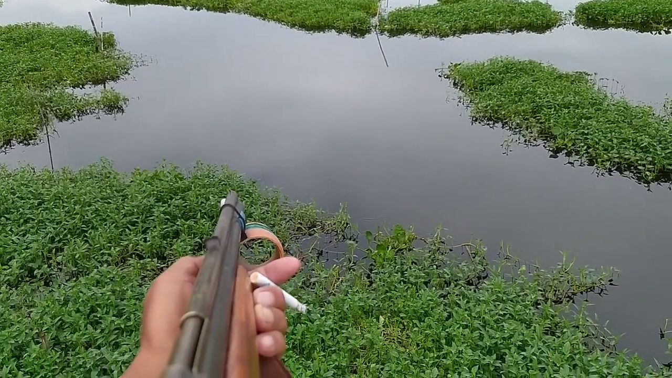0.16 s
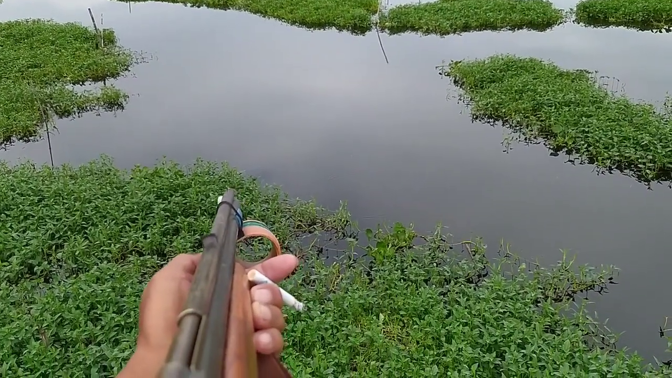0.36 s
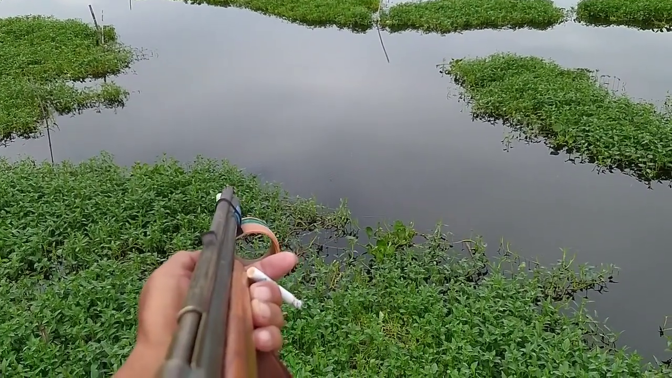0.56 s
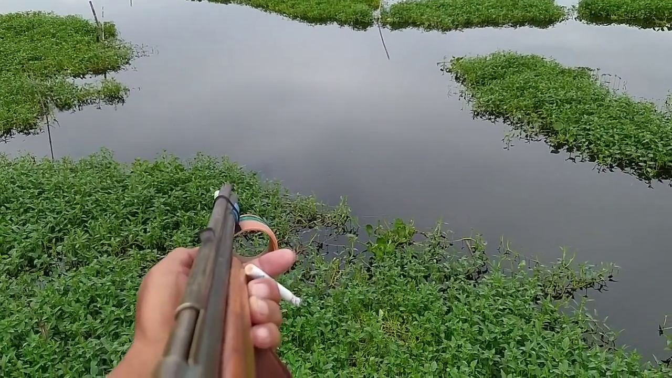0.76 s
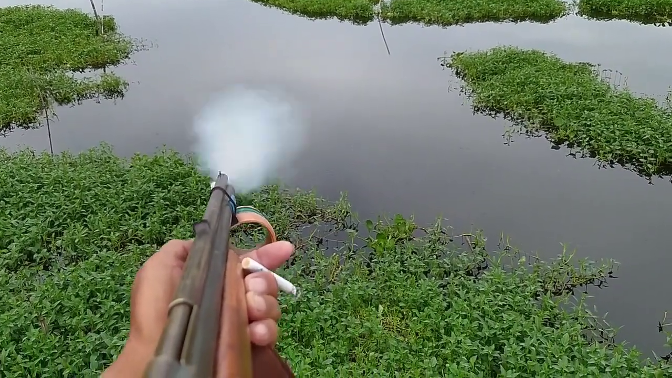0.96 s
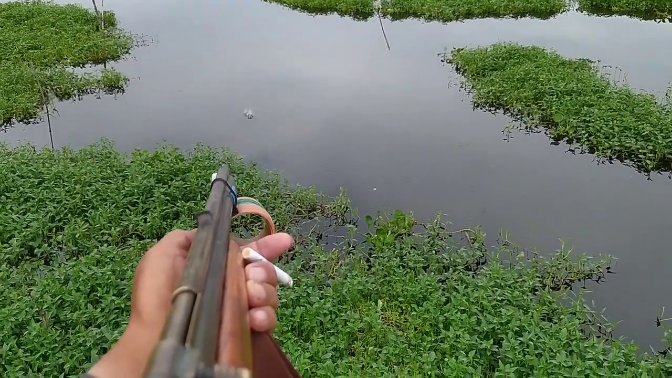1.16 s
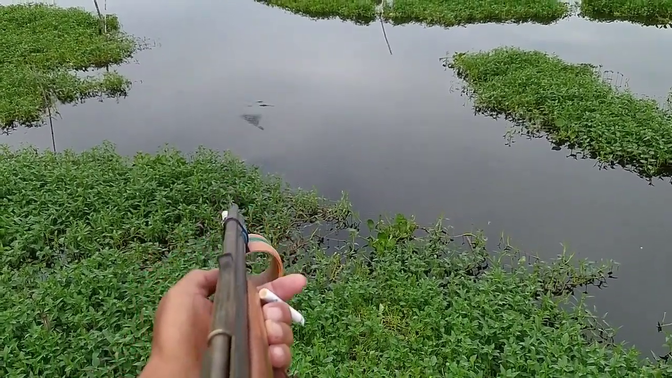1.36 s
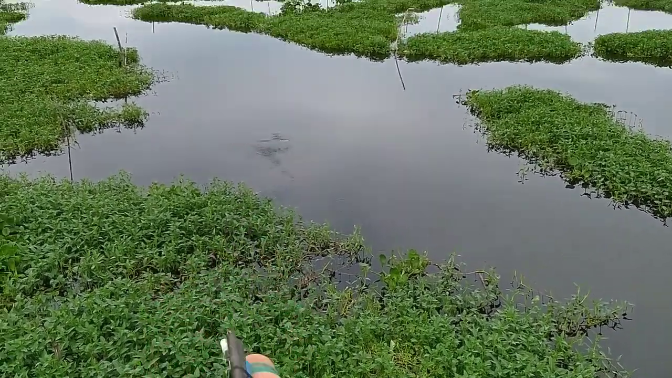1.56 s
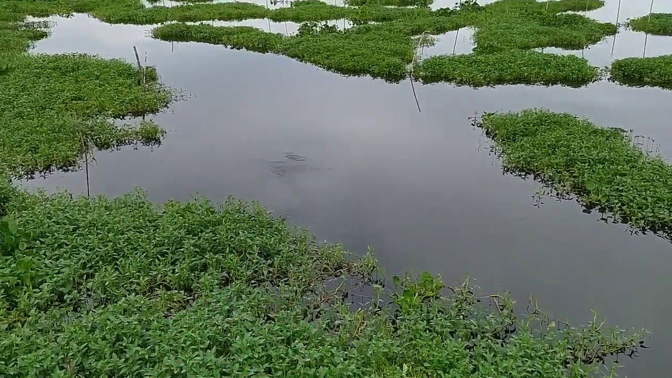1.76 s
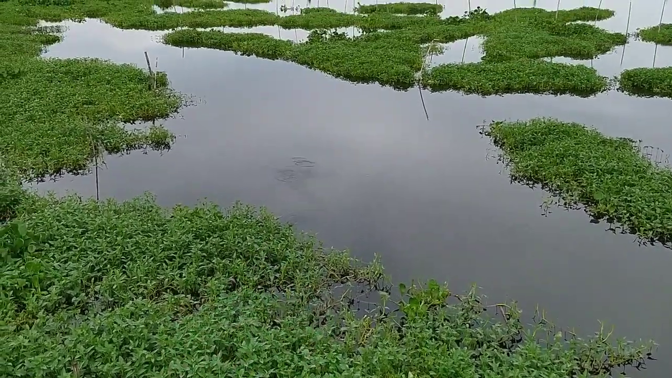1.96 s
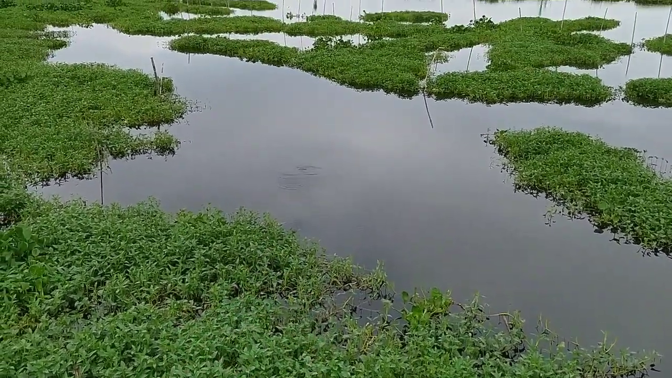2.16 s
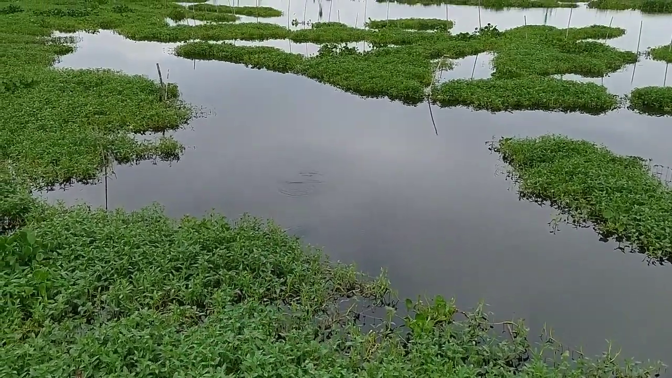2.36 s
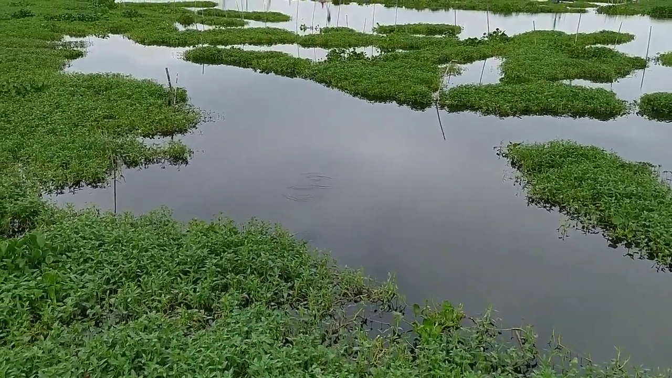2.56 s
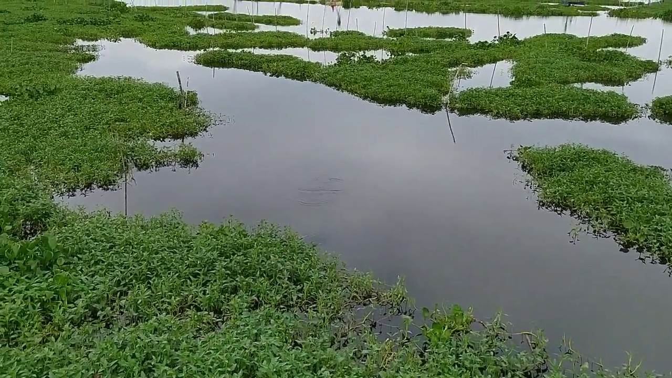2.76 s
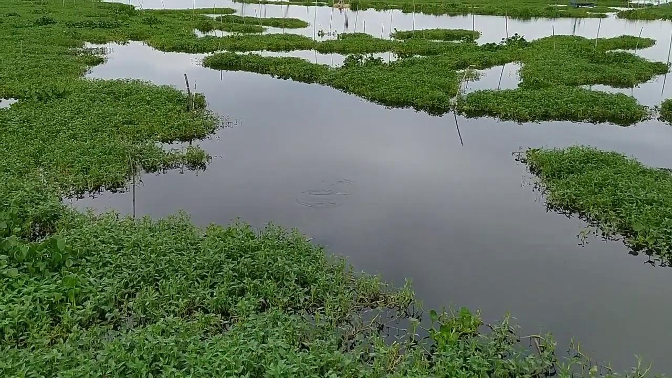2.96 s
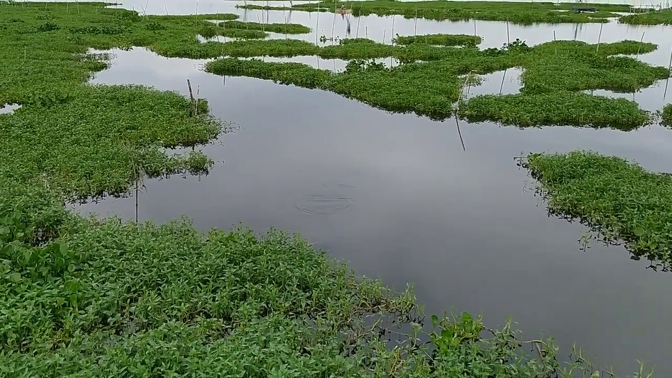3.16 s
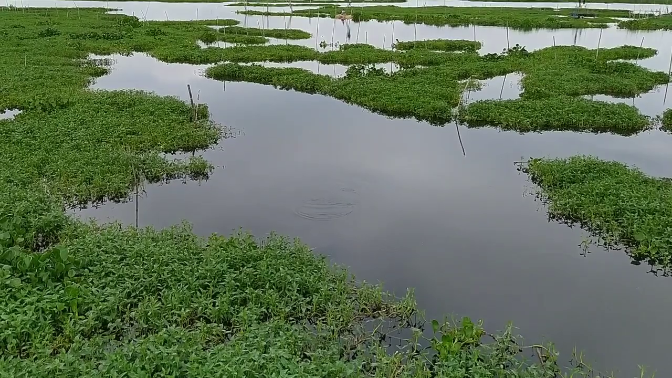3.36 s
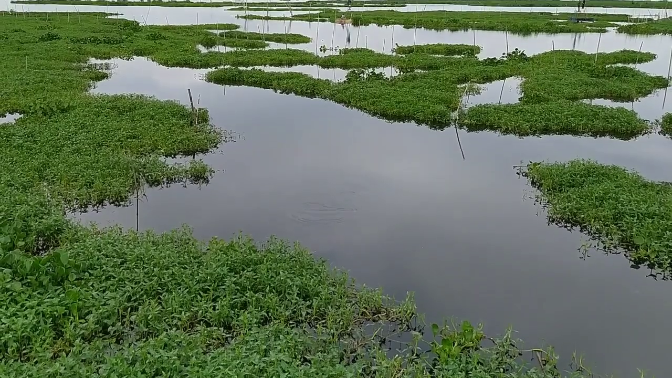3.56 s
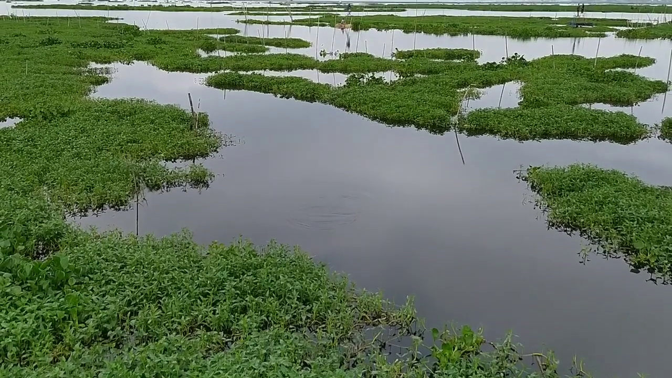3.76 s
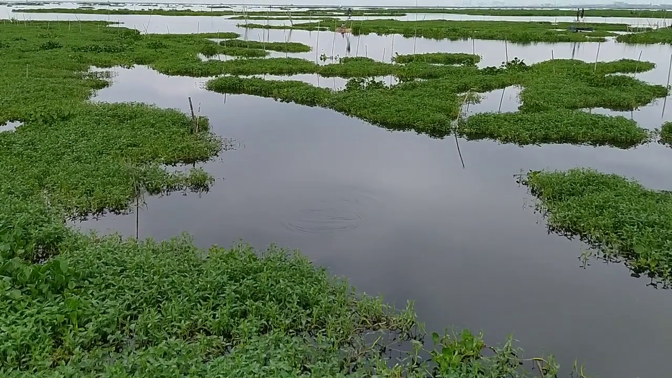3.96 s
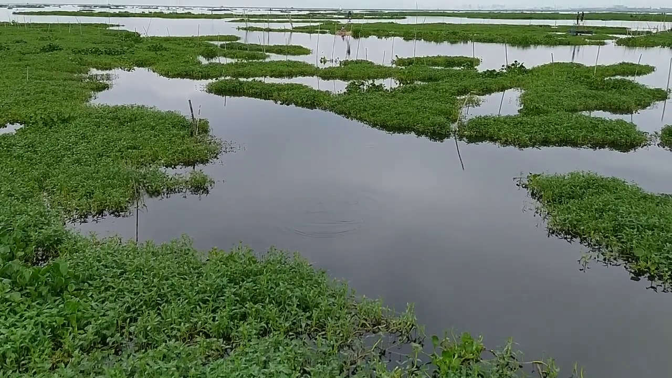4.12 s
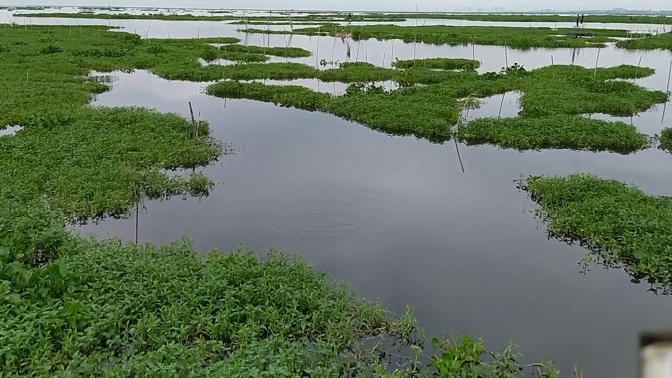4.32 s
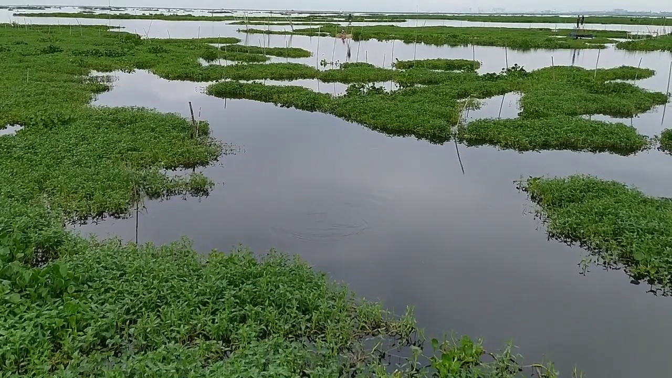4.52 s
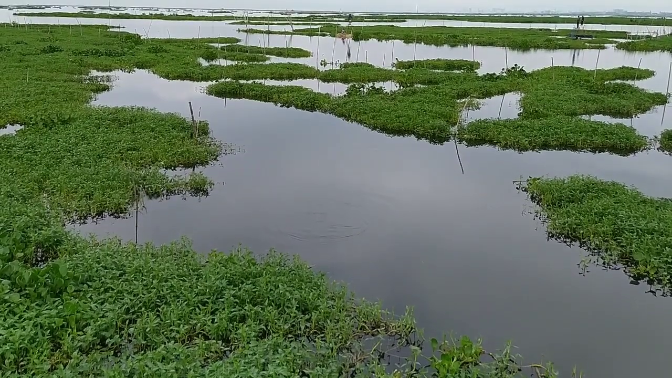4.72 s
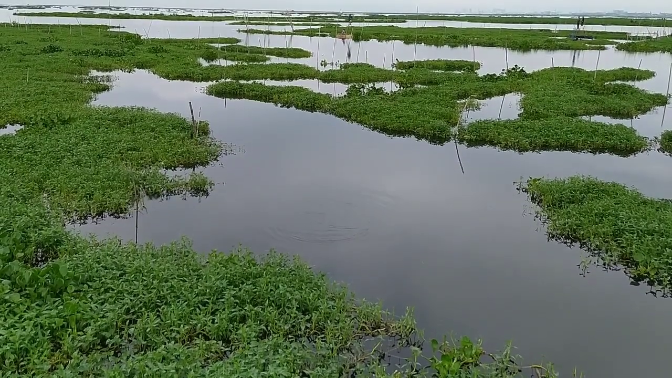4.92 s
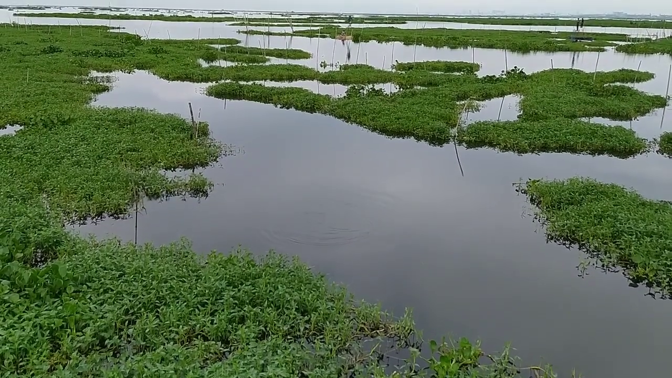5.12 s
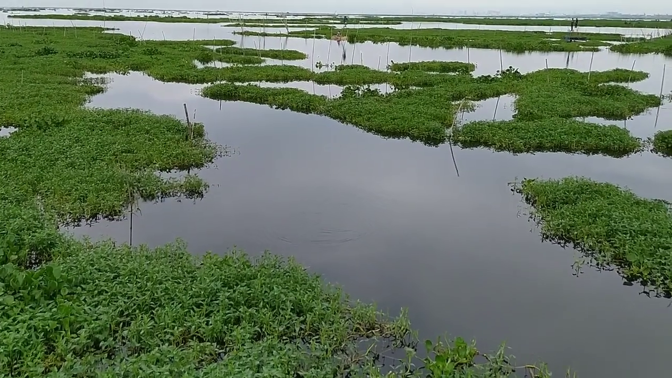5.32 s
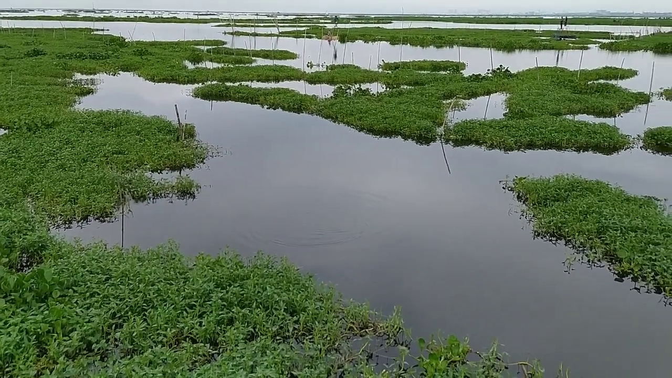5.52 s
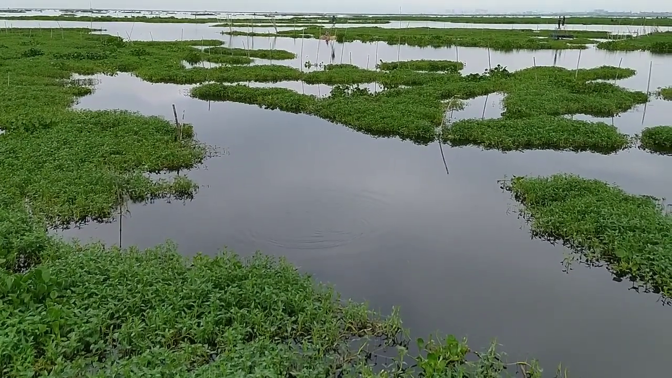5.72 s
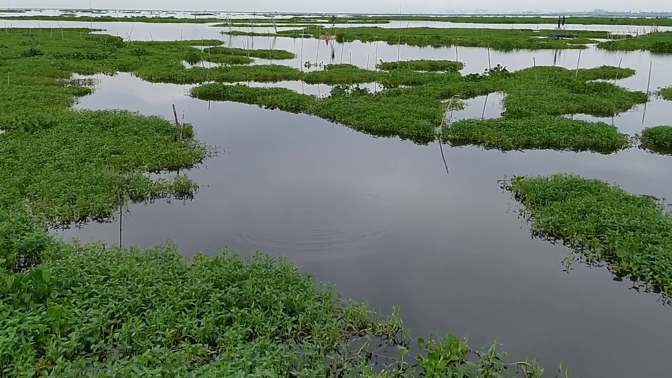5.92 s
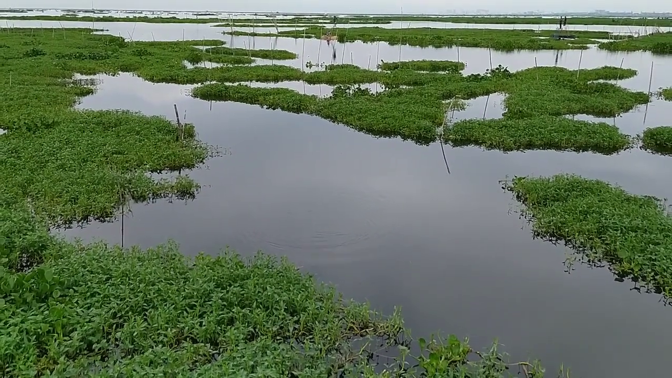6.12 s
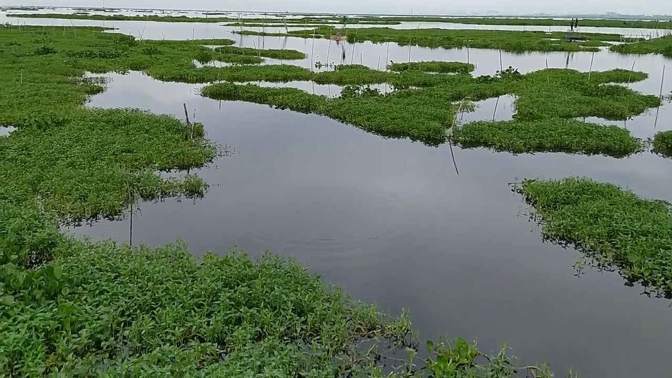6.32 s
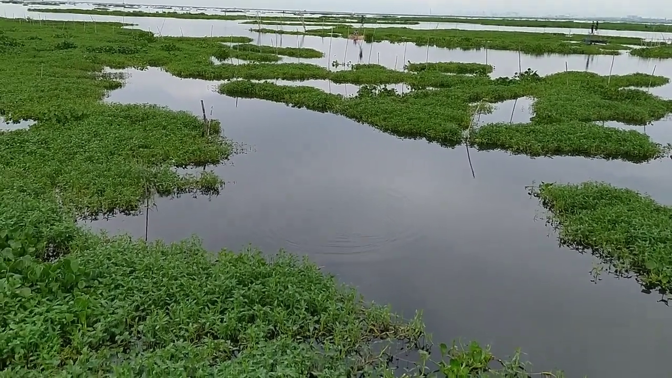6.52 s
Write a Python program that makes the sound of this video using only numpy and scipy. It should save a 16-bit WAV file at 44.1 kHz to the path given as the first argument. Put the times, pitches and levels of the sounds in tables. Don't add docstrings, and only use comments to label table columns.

```python
import sys
import numpy as np
from scipy import signal
from scipy.fft import rfft, irfft, next_fast_len
from scipy.io import wavfile
from scipy.ndimage import map_coordinates

SR = 44100
rng = np.random.default_rng(int(sys.argv[2]) if len(sys.argv) > 2 else 0)


def materialize(psi):
    bounded = np.clip(np.atleast_2d(psi).T, -1, 1)
    quanta = np.round(bounded * 32767).astype(np.int16)
    wavfile.write(sys.argv[1], SR, quanta)


def voltage_ratio(decibels):
    exponent = np.asarray(decibels, float) / 20
    return 10 ** exponent


N = 294499
SIZE = next_fast_len(N)
TIME = np.arange(N) / SR
HZ = np.maximum(np.fft.rfftfreq(SIZE, 1 / SR), 1)


def rms_one(x):
    return x / np.sqrt(np.mean(x ** 2, axis=-1, keepdims=True) + 1e-20)


def in_time(rows):
    s, db = np.transpose(rows)
    return np.interp(TIME, s, db)


def at_hz(points):
    hz, value = np.transpose(points)
    return np.interp(np.log(HZ), np.log(hz), value)


def colour(x, spectrum):
    return rms_one(irfft(rfft(x, SIZE) * voltage_ratio(at_hz(spectrum)), SIZE)[..., :N])


def noise():
    return rng.standard_normal((2, N))


def drift(rate):
    knots = rng.standard_normal((2, int(N / SR * rate) + 2))
    return np.array([np.interp(TIME * rate, np.arange(len(k)), k) for k in knots])


def grains(per_s, spread_db):
    excess = np.minimum(rng.exponential(1, (2, N)), 4)
    sizes = voltage_ratio(spread_db * excess) * rng.choice([-1, 1], (2, N))
    return sizes * (rng.random((2, N)) < per_s / SR)


def pan(side_db):
    half = np.atleast_1d(side_db) / 2
    return voltage_ratio(np.array([half, -half]))


def resonance(x, hz, width_hz):
    r = np.exp(-np.pi * width_hz / SR)
    zeros = np.array([1, 0, -1]) * (1 - r * r) / 2
    return signal.lfilter(zeros, [1, -2 * r * np.cos(2 * np.pi * hz / SR), r * r], x)


def add(out, s, sound):
    i = round(s * SR)
    out[:, i:i + sound.shape[1]] += sound


def swells(s, rise_s, fall_s, db):
    t = TIME[::32, None]
    before = (s - t) / np.maximum(rise_s, .002)
    after = (t - s) / np.maximum(fall_s, .002)
    away = np.minimum(np.maximum(before, after), 8)
    power = np.sum(voltage_ratio(db - 25 * away) ** 2, axis=1)
    return np.interp(TIME, t[:, 0], np.sqrt(power))


def patches(x, depth_db, width_hz, length_s):
    hz, s, z = signal.stft(x, SR, nperseg=256)
    knots = rng.standard_normal((200, 1000))
    places = np.meshgrid(hz / width_hz, s / length_s, indexing="ij")
    gain = map_coordinates(knots, places, order=1, mode="wrap")
    return signal.istft(z * voltage_ratio(depth_db * gain), SR, nperseg=256)[1][:, :x.shape[1]]


def blow(modes, crack_db, crack_s, crack_hz, loose=1):
    t = TIME[:4000]
    low_pass = signal.butter(2, min(crack_hz, 15000), fs=SR, output="sos")
    burst = signal.sosfilt(low_pass, rng.standard_normal((2, len(t))))
    sound = voltage_ratio(crack_db - 60 * t / crack_s) * rms_one(burst)
    for hz, db, t60 in modes:
        level_db = db + loose * rng.normal(0, 4.8, (2, 1))
        start = loose * rng.uniform(0, 3.2, (2, 1))
        sound = sound + voltage_ratio(level_db - 60 * t / t60) * np.sin(2 * np.pi * hz * t + start)
    return sound * np.minimum(t / 0.00067, 1)


def glides(rows, octave_db):
    out = np.zeros((2, N))
    for s, length, start_hz, end_hz, db in rows:
        u = np.linspace(0, 1, round(length * SR))
        hz = start_hz + (end_hz - start_hz) * u
        phase = 2 * np.pi * np.cumsum(hz) / SR + np.array([[0], [.8]])
        shape = np.sin(np.pi * u ** 0.61) ** 2 * voltage_ratio(1.3 * drift(300)[:, :len(u)])
        add(out, s, voltage_ratio(db) * shape * (np.sin(phase) + voltage_ratio(octave_db) * np.sin(2 * phase)))
    return out


def insects():
    # (frequency [Hz], width [Hz], level [dB])
    wings = [(6732, 510, -9.5), (6882, 390, 0), (7400, 1100, -7.5), (8072, 210, -2.5), (8415, 430, -10.5)]
    # (time [s], level [dB])
    chorus_level = [(0.0, -47), (0.22, -46.5), (1.08, -44.5), (1.17, -48), (1.49, -49), (2.08, -48),
                    (2.77, -47.5), (3.27, -47), (4.07, -49), (4.89, -47), (5.21, -48.5), (6.3, -48),
                    (6.68, -47)]
    clicks = grains(1500 * voltage_ratio(1.5 * drift(60)), spread_db=0.0)
    rings = np.zeros((2, N))
    for k, (hz, width, db) in enumerate(wings):
        throb_db = 3.5 * drift(35.22)
        ring = resonance(resonance(clicks, hz, width), hz, width)
        rings += (-1) ** k * voltage_ratio(db + throb_db) * ring
    band = signal.butter(4, [6250, 8900], "band", fs=SR, output="sos")
    return voltage_ratio(in_time(chorus_level) + 0.4 * drift(4.6)) * rms_one(signal.sosfilt(band, rings))


def lake_air():
    # (frequency [Hz], density [dB per Hz])
    rumble_colour = [(8.8, -36.5), (15, -10), (64, -2.5), (119, -7), (154, -3.5), (199, -9), (277, -16),
                     (326, -18.5), (667, -31), (1090, -48), (1200, -42), (1560, -76.5), (2640, -120)]
    # (time [s], level [dB])
    rumble_level = [(0.0, -50.5), (0.59, -52), (1.08, -52.5), (1.34, -52.5), (2.73, -52), (3.07, -54),
                    (3.59, -52), (4.22, -54), (4.43, -52.5), (5.17, -52.5), (5.69, -49.5), (5.88, -51),
                    (6.57, -50.5), (6.68, -51)]
    # (frequency [Hz], likeness [0 to 1])
    likeness = [(60, 0.73), (180, 0.98), (550, 0.34), (1650, 1), (4970, 0.04), (15000, -0.02)]
    # (frequency [Hz], density [dB per Hz])
    air_colour = [(500, -1.5), (1200, -10), (3000, -11), (6000, -11.5), (9500, -6), (11100, -6),
                  (12500, -13), (14000, -5.5), (16000, -15)]
    mid, side = rfft(rng.standard_normal((2, SIZE)))
    alike = np.clip(at_hz(likeness), 0, 1)
    pair = np.sqrt(1 + alike) * mid + np.sqrt(1 - alike) * side * [[1], [-1]]
    far = colour(irfft(pair, SIZE)[:, :N], rumble_colour)
    rumble = voltage_ratio(in_time(rumble_level) + 1.6 * drift(9)[0]) * far
    return rumble + voltage_ratio(-63.5 + .8 * drift(3.2)) * colour(noise(), air_colour)


def drips_and_chirps():
    # (time [s], length [s], start [Hz], end [Hz], peak [dB])
    calls = [(0.838, 0.043, 870, 780, -56.5), (1.161, 0.029, 560, 930, -31.5),
             (3.403, 0.018, 3600, 3887, -52.5), (3.591, 0.019, 3670, 3700, -57.5),
             (4.146, 0.019, 3600, 3670, -57), (4.26, 0.02, 3670, 3700, -62),
             (3.975, 0.033, 3800, 3620, -60), (3.976, .022, 4700, 4600, -63),
             (4.15, 0.025, 4600, 4600, -62.5)]
    return glides(calls, octave_db=-23)


def thud(reel):
    # (time [s], peak [dB])
    thumps = [
        (1.013, -14.5),
        (1.031, -15.5),
    ]
    # (frequency [Hz], density [dB per Hz])
    thud_colour = [(40, 2), (90, -10), (160, -3), (221, -8.5), (318, -2.5), (370, -8), (563, -10.5),
                   (600, -6.5), (780, -39.5), (1320, -120)]
    s, db = np.transpose(thumps)
    gain = swells(s, rise_s=0.042, fall_s=.022, db=db) + voltage_ratio(-24) * reel
    low = gain * colour(noise(), thud_colour)
    return 0.796 * (low + 0.35 * low[::-1])


def rattle(reel):
    # (frequency [Hz], density [dB per Hz])
    rattle_colour = [(240, -35), (400, -17.5), (693, -2.5), (1130, -7.5), (1240, -5), (2460, -1),
                     (3760, -8.5), (5000, -9.5), (6500, -21.5), (11000, -120)]
    # (frequency [Hz], width [Hz], level [dB])
    groove = [(1010, 149.2, 1.5), (1410, 52, -0.5), (1967, 150, -1), (2600, 110, -2), (3000, 67, 2),
              (5040, 150, -3)]
    leaves_s, t60_s = 1.0324, 0.055
    shaft = voltage_ratio(-14 - 60 * np.maximum(TIME - leaves_s, 0) / t60_s)
    rough = colour(grains(5000, spread_db=1.0), rattle_colour)
    rings = sum(voltage_ratio(db) * resonance(rough, hz, width) for hz, width, db in groove)
    return np.hypot(shaft, reel) * voltage_ratio(2.5 * drift(150)) * rms_one(rough + rings)


def line_hiss(line_db):
    # (frequency [Hz], density [dB per Hz])
    hiss_colour = [(2350, -32.5), (4000, -7.5), (4790, -7.5), (6140, -5), (6550, -5.5), (9550, -3),
                   (11400, -4.5), (13200, -20), (14800, -14.5), (16000, -25)]
    hiss = colour(grains(9000, spread_db=3.0), hiss_colour)
    hiss[1] += 0.42 * resonance(hiss[1], 8500, 1500)
    swing_db = -0.5 * np.sin(2 * np.pi * 12 * (TIME - 1.056))
    return voltage_ratio(line_db) * pan(swing_db) * rms_one(hiss)


def line_whistle():
    # (frequency [Hz], density [dB per Hz])
    whistle_colour = [(6500, -28.5), (8500, -13), (9700, -2.5), (11200, -1), (12300, -6.5), (13500, -11),
                      (15500, -10), (16000, -25.5)]
    gain = swells(1.17, rise_s=0.33, fall_s=0.06, db=-30)
    return gain * colour(grains(7000, spread_db=3.5), whistle_colour)


def slap_stock():
    # (time [s], peak [dB], left-right [dB])
    slaps = [(0.9913, -18, 1), (0.996, -5.5, -1), (1.004, -3, 3), (1.0091, -12, 2), (1.0181, -7.5, 2),
             (1.0269, -4, 1.5), (1.038, -11, 1)]
    # (frequency [Hz], level [dB], t60 [s])
    stock = [(345, -6.5, 0.016), (916, 2, 0.012), (1591.5, -1.5, 0.018), (2600, -9, 0.02),
             (7177, 3, 0.01191)]
    out = np.zeros((2, N))
    for s, db, side_db in slaps:
        hit = blow(stock, crack_db=5, crack_s=0.0053, crack_hz=11000)
        add(out, s, voltage_ratio(db - 9.0) * pan(side_db) * hit)
    return out


def shot():
    # (time [s], level [dB])
    line = [(0.996, -11), (1.014, -18), (1.034, -14.5), (1.06, -17.5), (1.08, -26), (1.15, -29.5),
            (1.2, -32), (1.22, -38.5), (1.3, -46.5), (1.36, -53), (1.55, -64), (1.75, -63)]
    release_s = .9898
    line_db = in_time(line)
    reel = voltage_ratio(-15 + 0.75 * line_db)
    opening = np.clip((TIME - release_s) / .004, 0, 1) ** 2
    gate = opening * np.clip((1.8 - TIME) / .1, 0, 1)
    out = gate * (rattle(reel) + line_whistle() + line_hiss(line_db))
    out[:, :2 * SR] = patches(out[:, :2 * SR], depth_db=4.0, width_hz=700, length_s=0.021)
    return out + gate * thud(reel) + slap_stock()


def sway():
    # (start [s], length [s], left height [full scale], right height [full scale])
    pushes = [
        (1.0, .075, -.09, -.08),
        (1.05, .19, .22, .125),
    ]
    out = np.zeros((2, N))
    for s, length, left, right in pushes:
        add(out, s, np.hanning(round(length * SR)) * [[left], [right]])
    coupling_s = .2
    return signal.lfilter([1, -1], [1, -np.exp(-1 / (coupling_s * SR))], out)


def cloth():
    # (peak [s], rise [s], fall [s], level [dB], left-right [dB])
    rustles = [(1.42, 0.025, 0.31, -47, 2), (1.6, .4, 0.73, -58.5, 3.5), (1.782, .1, 0.048, -52, 5),
               (1.91, 0.063, .15, -54, 3.5), (2.1, 0.076, .18, -63, 6), (2.28, 0.11, .07, -78, 9),
               (3.334, 0.005, 0.006, -42, 3), (3.42, .2, 0.24, -67, 1), (3.722, .1, .02, -60.5, 9),
               (3.78, .06, 0.18, -64, 5.5), (3.943, 0.089, .015, -34, 2), (3.96, .02, 0.055, -53, 4),
               (4.584, 0.064, 0.15, -55.5, -6.5), (4.92, .6, 0.44, -62, 3), (5.532, 0.039, .07, -54, -3.5),
               (5.69, 0.034, 0.43, -68, 10), (6.154, .08, .06, -70.5, 7), (6.395, 0.31, 0.4, -53.5, -7)]
    # (frequency [Hz], density [dB per Hz])
    cloth_colour = [(3530, -49.5), (6000, -17.5), (6760, 1.5), (11300, 2.5), (13500, -15.5), (15500, -16),
                    (16000, -24)]
    high = colour(grains(6000, spread_db=0.5), cloth_colour) * voltage_ratio(1.2 * drift(60))
    *when, db, side_db = np.transpose(rustles)
    left = swells(*when, db + side_db / 2)
    right = swells(*when, db - side_db / 2)
    return np.array([left, right]) * high


def skin_drags():
    # (peak [s], rise [s], fall [s], dull rub [dB], scratch above it [dB])
    drags = [(1.46, 0.023, 0.29, -58.5, 6.5), (1.782, 0.045, 0.032, -59.5, -1),
             (1.976, 0.078, 0.085, -66, 2), (2.174, 0.13, .06, -61, -5.5), (2.28, 0.052, .15, -75, -14),
             (2.47, 0.44, 0.37, -61, -6.5), (3.299, 0.46, 0.12, -66, -24), (3.338, 0.006, 0.013, -49, -14),
             (3.45, 0.65, 0.058, -76, 4), (3.6, 0.02, .05, -65, -3), (3.722, 0.16, .03, -70, 5.5),
             (3.918, .02, .03, -58, 9), (3.941, 0.093, .015, -60, 13), (3.948, 0.02, 0.0091, -39.5, -1.5),
             (3.96, .02, 0.059, -57, 0), (4.584, 0.041, 0.035, -54, -6), (4.77, 0.19, 1, -61.5, -9),
             (5.024, 0.25, 0.046, -58, 3), (5.532, 0.01, 0.028, -59, 8), (5.926, 0.44, .1, -66.5, -14.5),
             (6.164, .012, 0.081, -60, 3), (6.396, 0.54, 0.44, -68.5, 9.5)]
    # (frequency [Hz], density [dB per Hz])
    dull_colour = [(250, -28), (450, -8), (1000, -2.5), (1500, -8), (2500, -29)]
    # (frequency [Hz], density [dB per Hz])
    scratch_colour = [(760, -31), (1300, -9.5), (2480, -9.5), (3380, -12.5), (4740, -11), (6500, -16),
                      (8450, -39), (14300, -120)]
    dull = colour(grains(1500, spread_db=4.0), dull_colour) * voltage_ratio(2.1 * drift(31))
    scratch = colour(grains(3000, spread_db=4.5), scratch_colour) * voltage_ratio(2.1 * drift(60))
    scratch = patches(scratch, depth_db=4.5, width_hz=653, length_s=.03)
    *when, db, scratch_db = np.transpose(drags)
    return swells(*when, db) * dull + swells(*when, db + scratch_db) * scratch


def taps():
    # (time [s], peak [dB], ring [Hz], left-right [dB], crack [dB])
    hand_taps = [(1.4612, -43.5, 1350, -2, -10.5), (1.7702, -49.5, 3000, -9, -2),
                 (1.9774, -43, 1580, -3, -13), (2.139, -48, 1370, 6.5, -13), (2.2737, -52.5, 958, 5, -19),
                 (2.2977, -53, 1034, -6, -19.5), (2.4068, -58, 947, 5, -7.5), (2.4231, -45.5, 1290, 2, -12),
                 (2.716, -54.5, 1500, -3.5, -12.5), (3.2868, -47, 1750, -6, -10),
                 (3.947, -36.5, 1200, 3, -9), (4.526, -58, 1410, -4, 6), (4.577, -43.5, 1430, 0, 0),
                 (4.9902, -36, 1470, -0.5, -13), (5.013, -38, 1440, -1, -20), (5.029, -43, 1380, -2, -9),
                 (5.2125, -48.5, 1670, 0, 3.5), (5.5271, -37.5, 1730, 3.5, 1), (5.6, -51.5, 1140, 1, -12),
                 (6.1625, -52, 1410, -26.5, -5), (6.2073, -62, 1460, -2, 7), (6.3997, -39.5, 1370, 1, -8)]
    out = np.zeros((2, N))
    for s, db, hz, side_db, crack_db in hand_taps:
        t60 = 54.5 / hz
        wood = [(hz, -4, t60), (1.216 * hz, -8, 0.46 * t60),
                (1.975 * hz, -9, 0.31 * t60), (0.68 * hz, -11, 0.22 * t60)]
        hit = blow(wood, crack_db, crack_s=0.014, crack_hz=6070, loose=0.64)
        add(out, s, voltage_ratio(db) * pan(side_db) * hit)
    return out


def ticks():
    # (time [s], peak [dB], ring [Hz], left-right [dB])
    dry_ticks = [(1.4637, -40.5, 9900, -2), (1.7508, -41, 11300, 1.5), (1.781, -36, 11000, 4.5),
                 (1.8576, -47.5, 9700, 4.5), (3.3313, -27, 9500, -1), (3.3877, -41, 11100, 9.5),
                 (3.864, -44, 10150, -1), (4.0802, -34, 11600, 19.5), (4.4816, -28.5, 9700, -17.5),
                 (4.575, -35.5, 9900, -21), (5.012, -40, 9500, -16), (5.5266, -38, 9150, -8)]
    out = np.zeros((2, N))
    for s, db, hz, side_db in dry_ticks:
        modes = [(hz, -3, .008), (1.25 * hz, -8, .004), (1.48 * hz, -13, .003), (.85 * hz, -9, .004)]
        hit = blow(modes, crack_db=-23, crack_s=0.0075, crack_hz=15000, loose=0.36)
        add(out, s, voltage_ratio(db) * pan(side_db) * hit)
    return out


def snaps():
    # (time [s], peak [dB], ring [Hz], left-right [dB])
    joint_snaps = [
        (3.3315, -34, 2500, 4),
        (3.333, -19, 2100, 0),
        (3.9443, -25.5, 2160, -8),
        (5.5254, -32.5, 2760, -1),
    ]
    out = np.zeros((2, N))
    for s, db, hz, side_db in joint_snaps:
        modes = [(hz, -2, .009), (1.92 * hz, -7, .007), (0.61 * hz, -14, .008), (1.4 * hz, -8, .006)]
        hit = blow(modes, crack_db=-7, crack_s=0.008, crack_hz=9000, loose=0.36)
        add(out, s, voltage_ratio(db) * pan(side_db) * hit)
    return out


def knocks():
    # (time [s], peak [dB], left-right [dB], upper modes [dB], share of the full ring [1])
    stock_knocks = [
        (3.3339, -42, -3, -4, .4),
        (3.945, -29.5, 1.5, -5, 1.01),
    ]
    # (frequency [Hz], level [dB], t60 [s])
    hollow = [(288, -6.5, 0.091), (442, 0, 0.1), (560, -11, 0.019), (1200, -2, 0.033), (2300, -10, 0.0052)]
    out = np.zeros((2, N))
    for s, db, side_db, upper_db, ring in stock_knocks:
        modes = [(hz, mode_db + upper_db * (hz > 1e3), ring * t60) for hz, mode_db, t60 in hollow]
        hit = blow(modes, crack_db=-10, crack_s=0.007, crack_hz=3000, loose=0.48)
        add(out, s, voltage_ratio(db) * pan(side_db) * hit)
    return out


def slide():
    # (peak [s], rise [s], fall [s], level [dB])
    jerks = [
        (3.882, 0.017, .03, -47.5),
        (3.896, .02, .03, -58),
        (3.911, 0.013, .03, -43),
        (3.921, .015, 0.043, -46),
        (3.932, 0.022, .02, -47),
        (3.943, .015, .006, -38),
    ]
    # (frequency [Hz], width [Hz], level [dB])
    slide_rings = [(2170, 430, 2), (4700, 570, -4), (1290, 320, -16)]
    skin = grains(8600, spread_db=-2.0)
    rings = sum(voltage_ratio(db) * resonance(skin, hz, width) for hz, width, db in slide_rings)
    return swells(*np.transpose(jerks)) * rms_one(rings)


def squeak():
    # (time [s], length [s], start [Hz], end [Hz], peak [dB])
    parts = [
        (4.905, 0.042, 2720, 2550, -64),
        (4.926, 0.031, 2696, 2600, -36.5),
    ]
    return glides(parts, octave_db=-3)


def scene():
    duck_db = np.interp(TIME, [.99, 1.03, 1.13, 1.3], [2.0, -12.0, -4.5, 3])
    surroundings = voltage_ratio(duck_db) * (insects() + lake_air())
    handling = cloth() + skin_drags() + taps() + ticks() + snaps() + knocks() + slide()
    return surroundings + drips_and_chirps() + shot() + sway() + handling + squeak()


def top_cut(x):
    return signal.sosfilt(signal.butter(12, 16570, fs=SR, output="sos"), x)


def record(dry):
    top = signal.cheby2(10, 60, 16500, fs=SR, output="sos")
    rounded = 0.9 * np.tanh(dry / 0.98)
    return top_cut(signal.sosfilt(top, rounded))


dry = scene()
out = record(dry)
materialize(out)
```